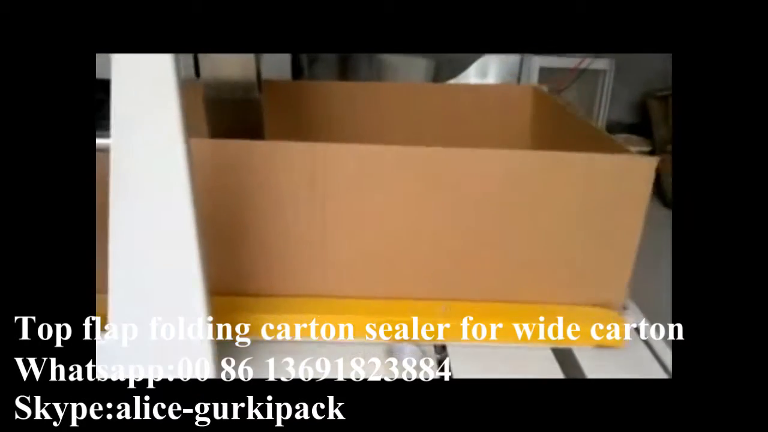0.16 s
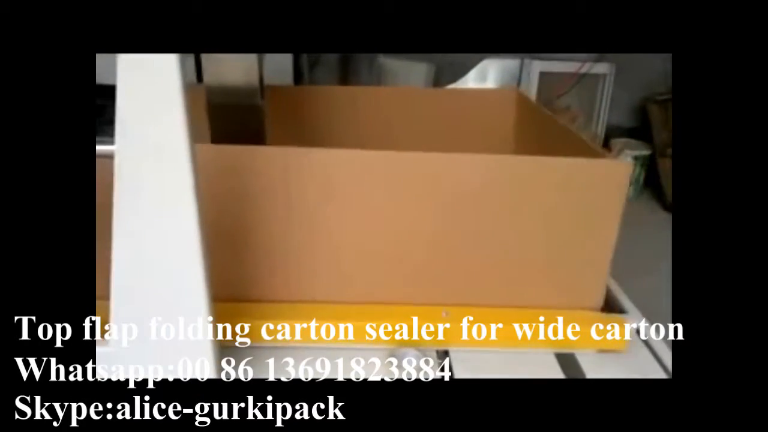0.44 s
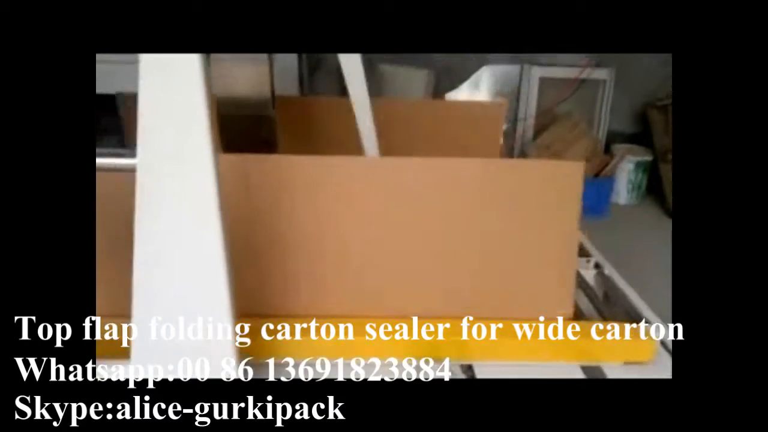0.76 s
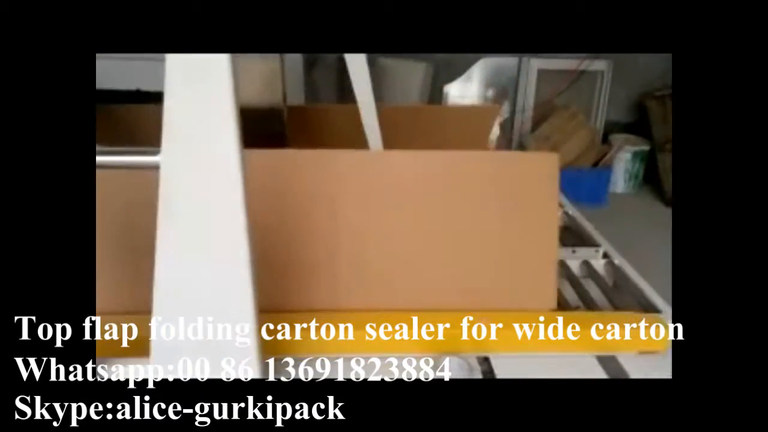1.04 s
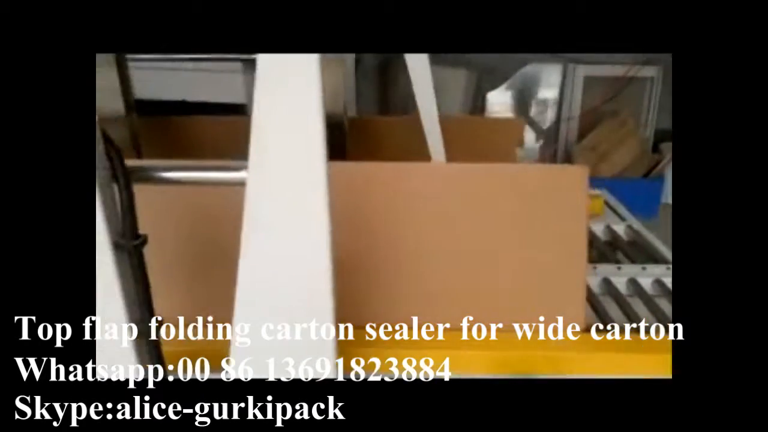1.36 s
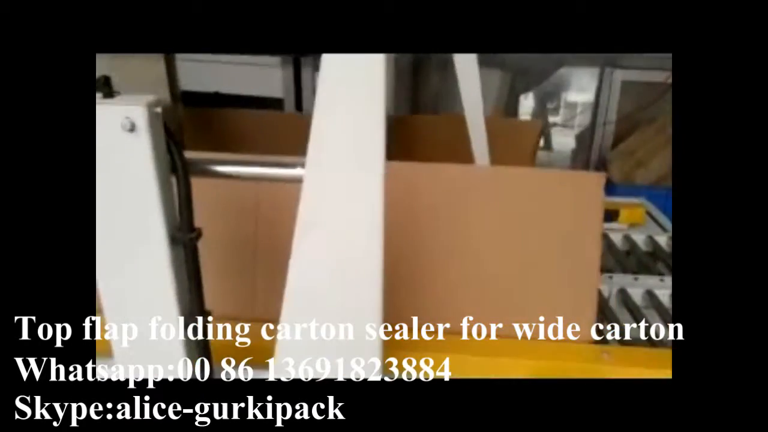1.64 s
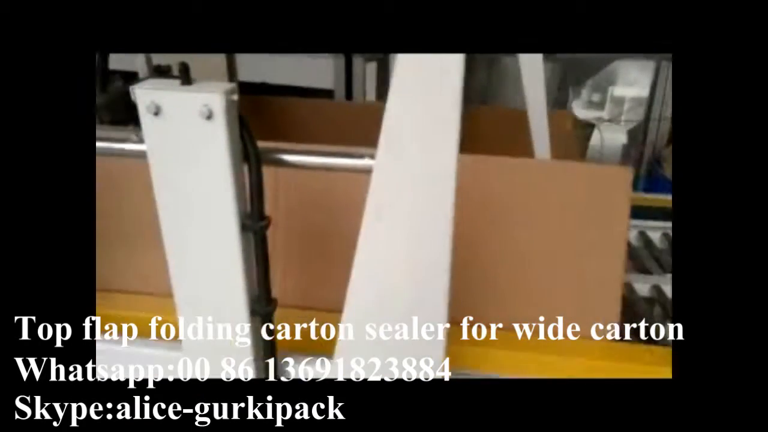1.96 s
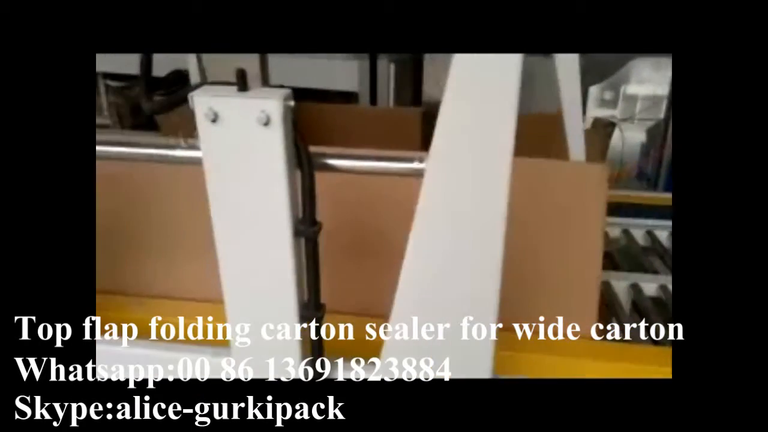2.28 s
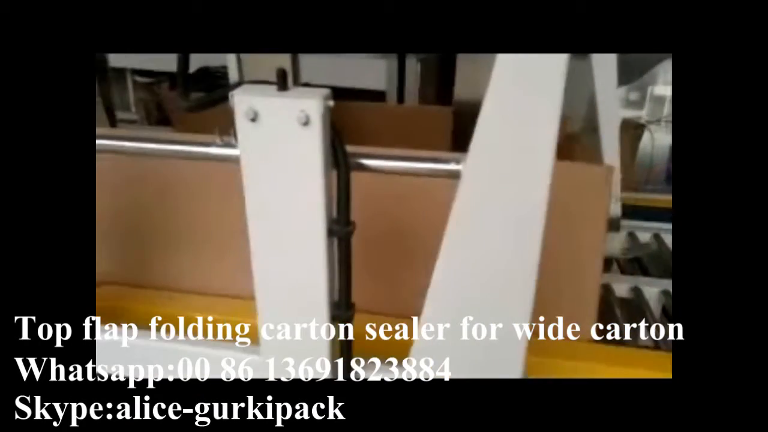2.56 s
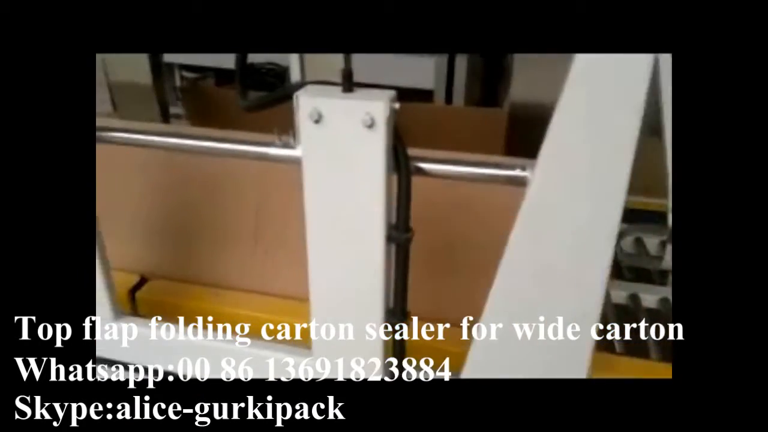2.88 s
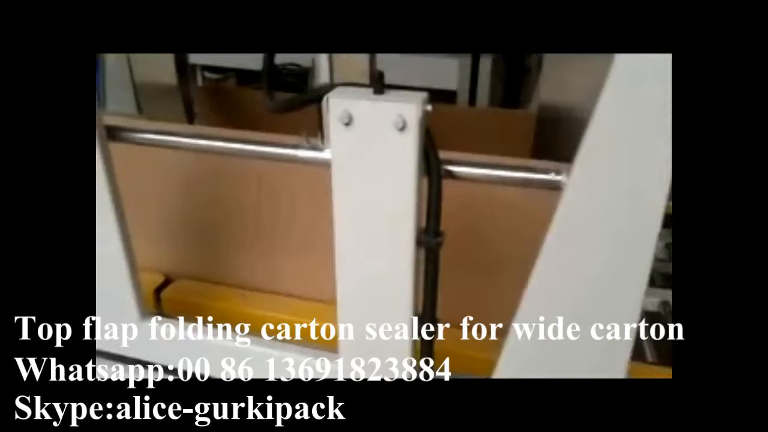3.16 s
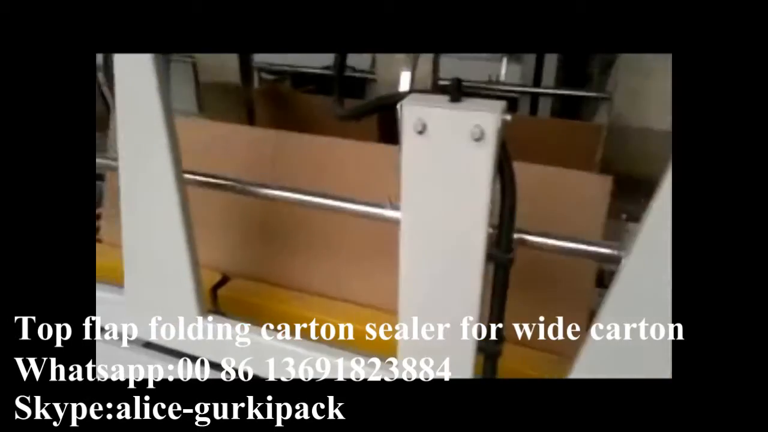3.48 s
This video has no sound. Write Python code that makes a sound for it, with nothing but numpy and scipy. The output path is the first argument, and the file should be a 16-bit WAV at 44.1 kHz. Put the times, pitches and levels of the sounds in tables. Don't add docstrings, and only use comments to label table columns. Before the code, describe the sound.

A carton sealing machine runs in a factory hall, belts and rollers rumbling under a gear motor hum, with airy hiss and a light knock near 0.3 s. At 0.7 s a cylinder slams a large cardboard box: hollow booms, shudder, clacks, bright hiss peaking at 0.9 s. Around 1.3 s a flap scrapes with a second hiss. Quieter rumble follows, with low wind puffs mostly right, clacks and a faint rail scrape near 2.8 s.

```python
import sys
import numpy as np
from scipy import signal
from scipy.fft import rfft, irfft, dct, next_fast_len
from scipy.io import wavfile
from scipy.ndimage import uniform_filter1d, map_coordinates

SR = 44100
rng = np.random.default_rng(int(sys.argv[2]) if len(sys.argv) > 2 else 0)


def unload_wav(signal):
    wavfile.write(
        sys.argv[1],
        SR,
        np.round(np.clip(np.atleast_2d(signal).T, -1, 1) * 32767).astype(np.int16),
    )


def gain_from_db(level_db):
    decades = np.asarray(level_db, float) / 20
    return 10 ** decades


N = 159642
T = np.arange(N) / SR


def unit(x):
    return x / np.sqrt(np.mean(x ** 2) + 1e-20)


def along(points, hz):
    f, v = np.transpose(points)
    return np.interp(np.log(hz + 1), np.log(f + 1), v)


def fader(rows, outside_db=None):
    s, db = np.transpose(rows)
    return gain_from_db(np.interp(T, s, db, outside_db, outside_db))


def wobble(rate):
    knots = rng.standard_normal(int(N * 40 / SR) + 4)
    return map_coordinates(knots, [T * np.clip(rate, .1, 39)])


def filtered(x, response):
    m = next_fast_len(N + SR // 2)
    hz = np.fft.rfftfreq(m, 1 / SR)
    return irfft(rfft(x, m) * response(hz), m)[..., :N]


def resonant(peaks):
    def response(f):
        total = 0
        for k, (centre, width, db) in enumerate(peaks):
            damping = 1j * f * width
            total = total + (-1) ** k * gain_from_db(db) * damping / (centre * centre - f * f + damping)
        return total
    return response


def grit(grainy_db, patchy_db):
    grains = gain_from_db(grainy_db * unit(uniform_filter1d(rng.standard_normal(N), size=90)))
    z = signal.stft(rng.standard_normal((2, N)) * grains, nperseg=512)[2]
    field = uniform_filter1d(rng.standard_normal(z.shape[1:]), size=5, axis=0)
    field = uniform_filter1d(field, size=10, axis=1)
    return signal.istft(z * gain_from_db(patchy_db * unit(field)), nperseg=512)[1][:, :N]


# time_s, level_db
BELT_LOAD = [(0, -29.5), (.3, -29.5), (.66, -28), (1., -30), (1.45, -33), (1.7, -33.5), (2.4, -34.5),
             (2.55, -31), (2.9, -31), (3.05, -31.5), (3.62, -32.5)]
# pitch_hz, density_db_per_hz
RUMBLE_COLOUR = [(50, -12.5), (250, -9.5), (450, -15.5), (640, -14.5), (1260, -21), (2450, -24.5),
                 (3650, -26.5), (5500, -36), (7200, -45), (9000, -57.5)]
# pitch_hz, level_db, unsteadiness_hz
MOTOR_HUM = [(99.4, -36.5, 7), (282, -35, 8.79), (472, -50, 25), (653, -44.5, 5), (979, -43, 24),
             (1303, -46, 20)]


def belts():
    rumble = unit(filtered(grit(grainy_db=.8, patchy_db=1.2), lambda hz: gain_from_db(along(RUMBLE_COLOUR, hz))))
    hum = np.zeros((2, N))
    for hz, db, unsteadiness in MOTOR_HUM:
        swell = gain_from_db(db + 3.5 + 4.24 * wobble(14))
        drift = unsteadiness * np.array([wobble(30), wobble(25)])
        hum += swell * np.sin(2 * np.pi * np.cumsum(hz + drift, axis=1) / SR)
    load = fader(BELT_LOAD)
    return load * gain_from_db(5.5 + 1.4 * wobble(12)) * rumble + (load / load.mean()) ** 1.5 * hum


# time_s, level_db
AIR_FLOW = [(0, -31.5), (.28, -32.5), (.36, -42), (.67, -40), (.76, -33.5), (.83, -27), (.9, -21),
            (1., -22.5), (1.09, -29), (1.28, -27), (1.36, -25.5), (1.43, -33), (1.7, -40.5), (2.45, -41.5),
            (2.52, -40), (2.7, -39), (3.62, -36)]
# pitch_hz, density_db_per_hz
JET_COLOUR = [(1500, -44), (2500, -18), (2900, -3), (3500, -1), (4100, -1), (4800, -7), (6300, -8),
              (7300, -20.5), (9000, -23.5)]
# pitch_hz, width_hz, level_db
PORT_WHISTLE = [(3925, 57, -10), (4014, 6.7, -1.5), (4200, 30, -5)]
# pitch_hz, density_db_per_hz
FIZZ_COLOUR = [(3500, -35), (4600, 6), (5600, 4.5), (6800, 3), (8000, -22), (9500, -28)]
FIZZ_DB, FIZZ_GROWTH = -26, 1.8


def air():
    def colour(hz):
        return gain_from_db(along(JET_COLOUR, hz)) * (1 + gain_from_db(11.0) * np.abs(resonant(PORT_WHISTLE)(hz)))

    flow = fader(AIR_FLOW)
    fizz = unit(filtered(grit(grainy_db=1.2, patchy_db=2.5), lambda hz: gain_from_db(along(FIZZ_COLOUR, hz))))
    fizz = gain_from_db(FIZZ_DB) * (flow / flow.max()) ** FIZZ_GROWTH * fizz
    hiss = unit(filtered(grit(grainy_db=0.36, patchy_db=1.13), colour))
    return flow * gain_from_db(1.5 + 1.2 * wobble(20)) * hiss + fizz


# time_s, level_db
DRAUGHT_FLOW = [(0, -55.5), (1.3, -38.5), (1.9, -36.5), (3.62, -33.5)]
# pitch_hz, level_db
DRAUGHT_TONE = [(12, -38.5), (28, 0), (50, 4.5), (100, -25), (200, -26.5), (400, -56.5)]
# centre_s, left_db, right_db, pitch_hz
AIR_PUFFS = [(1.58, -48, -23, 55), (1.652, -40, -20.5, 54.6), (1.766, -42, -8, 49.5),
             (1.856, -33.5, -13, 51), (1.981, -28, -40, 90), (2.111, -17, -12, 55),
             (2.165, -39.5, -14.5, 55), (2.227, -44, -11.5, 60.7), (2.305, -28, -5.5, 54),
             (2.651, -33, -10.5, 48.5), (2.758, -42, -28, 54.4), (2.888, -26, -16.5, 50),
             (2.938, -24, -15, 55.5), (3.158, -28, -29, 55), (3.256, -36, -16, 52.5), (3.428, -24, -15, 63),
             (3.477, -20, -41, 74.5), (3.551, -36, -14.5, 50.6)]
PUFF_CYCLES = 1.08


def puffs():
    lumps = gain_from_db(1.4 * np.array([wobble(18), wobble(15)]))
    draught = filtered(rng.standard_normal((2, N)), lambda hz: gain_from_db(along(DRAUGHT_TONE, hz)))
    out = fader(DRAUGHT_FLOW) * gain_from_db([[-2.5], [2.5]]) * unit(lumps * draught)
    for s, left_db, right_db, hz in AIR_PUFFS:
        cycles = (T - s) * hz
        swing = np.exp(-(2 * cycles / PUFF_CYCLES) ** 2) * np.sin(2 * np.pi * (cycles + rng.random()))
        out += gain_from_db([[left_db], [right_db]]) * swing
    return out


# time_s, level_db
SHUDDER = [(.672, -47), (.7, -11), (.74, -10.5), (.83, -19.5), (.9, -18), (1.03, -20.5), (1.09, -27),
           (1.13, -17), (1.25, -38.5)]
# pitch_hz, density_db_per_hz
BOX_COLOUR = [(40, -45.5), (90, -15.5), (180, -5), (330, -5.5), (500, -13.5), (1100, -18), (1600, -24.5),
              (3000, -42)]
# pitch_hz, width_hz, level_db
BOX_PANELS = [(155, 35, -0.5), (227, 40, -2.5), (277, 17, 0), (328, 62, 4.5), (497, 88, 8),
              (583, 51, -26.5)]
# start_s, level_db, hardness
BOX_KNOCKS = [(0.27, -21, 1.8), (0.72, -17.5, 0.35), (0.786, -13.5, 0.62), (0.854, -16.5, 0.6),
              (0.895, -11.5, 3.6), (0.988, -35, 1.5), (1.047, -25, 1.7), (1.118, -19.5, 0.79),
              (.686, -17.5, 1.6), (1.3, -20, 0.4), (2.78, -24, 2.9), (3.117, -24.5, 1.5), (3.141, -27, 1.2),
              (3.167, -23, 1.1)]


def box():
    def colour(hz):
        return gain_from_db(along(BOX_COLOUR, hz)) * (1 + 0.39 * np.abs(resonant(BOX_PANELS)(hz)))

    noise = unit(filtered(grit(grainy_db=0.0, patchy_db=-1.5), colour))
    shudder = fader(SHUDDER, -120) * gain_from_db(-3.5 + 2.8 * wobble(35)) * noise
    blows = np.zeros((2, N))
    for s, db, hardness in BOX_KNOCKS:
        u = np.clip(T - s, 0, .2) * 600 * hardness
        blows += gain_from_db(db) * u * np.exp(-u) * (1 + 0.64 * rng.standard_normal((2, N)))
    return shudder + gain_from_db(22.0) * filtered(blows, resonant(BOX_PANELS + FLAP_BODY[1:4]))


# start_s, level_db, swell_s, pitch_hz
PANEL_BOOMS = [(0.67, -10, 0.031, 128), (0.683, -14.5, 0.051, 85), (0.78, -18, .03, 180),
               (.755, -17.5, 0.039, 120), (0.64, -24.5, 0.035, 110), (0.88, -17, 0.041, 225),
               (.69, -21.5, 0.044, 285), (.76, -20.5, 0.032, 290), (.71, -20, 0.051, 460),
               (1.11, -21, 0.03, 86), (1.116, -24.5, .03, 144.6)]


def boom():
    out = np.zeros((2, N))
    for s, db, swell, hz in PANEL_BOOMS:
        u = np.clip((T - s) / swell, 0, 30)
        out[0] += gain_from_db(db) * u * np.exp((1 - u ** 2) / 2) * np.sin(2 * np.pi * hz * (T - s))
    return out


# start_s, level_db, pitch_hz, length_s
SMALL_CLACKS = [(0.689, -19, 3800, 0.078), (0.845, -18, 4830, 0.017), (1.299, -26, 5020, 0.091),
                (1.74, -25.5, 2380, 0.022), (2.028, -35, 4470, 0.035), (2.105, -38, 6010, 0.07),
                (2.189, -32.5, 4100, 0.023), (2.47, -29, 3400, 0.17), (2.785, -23.5, 4500, 0.007),
                (2.79, -28.5, 2900, .02), (1.739, -35.5, 5460, 0.03), (1.875, -37.5, 5140, 0.026)]


def clacks():
    out = np.zeros((2, N))
    for s, db, hz, length in SMALL_CLACKS:
        u = np.clip((T - s) / length, 0, 30)
        burst = rng.standard_normal((2, N)) * (1 - np.exp(-3.5 * u)) * np.exp(-1.4 * u)
        body = resonant([(hz, .35 * hz, 0)])
        out += gain_from_db(db + 17.5) * filtered(burst, lambda f: body(f) ** 2)
    return out


# time_s, level_db
FLAP_PRESSURE = [(1.285, -38), (1.31, -16), (1.37, -12.5), (1.42, -21.5), (1.45, -36), (1.48, -23),
                 (1.55, -40), (1.65, -49)]
# pitch_hz, width_hz, level_db
FLAP_BODY = [(377, 230, -3.5), (689, 136, 4.5), (843, 127, 3.5), (1433, 470, -4.5), (1525, 156, -0.5),
             (1986, 360, -10), (3680, 1300, -18.5)]
# time_s, level_db
RAIL_PRESSURE = [(2.76, -61.5), (2.79, -30.5), (2.84, -39.5), (2.9, -27), (2.96, -44), (3.0, -74.5)]
# pitch_hz, width_hz, level_db
RAIL_BODY = [(1400, 800, -5), (2010, 510, 4), (2900, 800, 1)]


def scrape():
    flap = unit(filtered(grit(grainy_db=-2.2, patchy_db=-1.0), resonant(FLAP_BODY)))
    rail = unit(filtered(grit(grainy_db=2.2, patchy_db=5.5), resonant(RAIL_BODY)))
    return fader(FLAP_PRESSURE, -120) * gain_from_db(-4.5) * flap + fader(RAIL_PRESSURE, -120) * rail


# pitch_hz, t60_s
HALL_DECAY = [(100, 1), (1000, 0.94), (6000, 0.16)]


def hall(x):
    hz, t, z = signal.stft(rng.standard_normal((2, SR // 2)), SR, nperseg=256)
    tail = signal.istft(z * gain_from_db(-60 * t / along(HALL_DECAY, hz)[:, None]), SR, nperseg=256)[1]
    late = np.pad(x[0], (500, 0))[None]
    return signal.fftconvolve(late, tail / np.linalg.norm(tail[0]), axes=1)[:, :N]


# pitch_hz, correlation
PORT_LIKENESS = [(60, 1), (200, 0.9), (700, 0.92), (1400, 0.4), (2800, 0.21), (6000, 0.16)]
# pitch_hz, level_db
LEFT_LOUDER = [(60, -1), (700, -2.5), (1400, 0), (2800, -3), (5000, -0.2)]
# pitch_hz, phase_rad
LEFT_LEAD = [(100, 0.5), (1300, -0.03), (2000, 1.5), (2700, 3.5), (3900, 7.5), (5000, 6), (7000, 5)]


def ports(pair):
    def spread(hz):
        turn = np.arccos(np.clip(along(PORT_LIKENESS, hz), 0, 1)) / 2
        return np.array([np.cos(turn), np.sin(turn)])

    def tilt(hz):
        left = gain_from_db(along(LEFT_LOUDER, hz) / 2) * np.exp(1j * along(LEFT_LEAD, hz) / 2)
        return np.array([left, 1 / left])

    mid, side = filtered(pair, spread)
    return filtered(np.array([mid + side, mid - side]), tilt)


def scene():
    events = box() + scrape() + clacks()
    return ports(belts() + air() + boom() + events + gain_from_db(-9.5) * hall(events)) + puffs()


# pitch_hz, level_db
WEAKEST_KEPT = [(2000, -70), (3500, -55), (5000, -52), (6200, -49.5), (7000, -45), (8200, -40), (8600, -5)]
STEP_FOLLOWS = .66


def starved(x):
    n = 2048
    window = np.sin(np.pi * (np.arange(2 * n) + .5) / (2 * n))
    padded = np.pad(x, [(0, 0), (n, 2 * n - N % n)]).reshape(2, -1, n)
    frames = np.concatenate([padded[:, :-1], padded[:, 1:]], axis=2) * window
    a, b, c, d = np.split(frames, 4, axis=2)
    z = dct(np.concatenate([-c[..., ::-1] - d, a - b[..., ::-1]], axis=2), type=4, norm="ortho")
    loud = np.sqrt(np.sum(z ** 2, axis=(0, 2)))[:, None] + 1e-9
    step = gain_from_db(along(WEAKEST_KEPT, np.arange(n) * SR / (2 * n)))
    step = step * loud ** STEP_FOLLOWS * loud.mean() ** (1 - STEP_FOLLOWS)
    frame_db = 1.8 * rng.standard_normal(loud.shape)
    band_db = 4.5 * np.repeat(rng.standard_normal((len(loud), n // 32)), 32, axis=1)
    step = step * gain_from_db(frame_db + band_db)
    p, q = np.split(dct(z * (np.abs(z) > step), type=4, norm="ortho"), 2, axis=2)
    frames = np.concatenate([q, -q[..., ::-1], -p[..., ::-1], -p], axis=2) * window
    head, tail = np.split(frames, 2, axis=2)
    return (tail[:, :-1] + head[:, 1:]).reshape(2, -1)[:, :N]


# pitch_hz, level_db
MIRROR_IMAGE = [(13000, -30), (15000, -11), (15800, -12)]


def mirrored(x):
    def band(hz):
        return gain_from_db(along(MIRROR_IMAGE, hz)) * (hz < 15790) * (hz > 12000)

    return filtered(x * (-1.) ** np.arange(N), band)


def low_pass(x):
    return signal.sosfilt(signal.butter(12, 17070, fs=SR, output="sos"), x)


def record(dry):
    ceiling = 0.96
    x = starved(dry / (1 + np.abs(dry / ceiling) ** 4) ** (1 / 4))
    return low_pass(x + mirrored(x))


dry = scene()
out = record(dry)
unload_wav(out)
```